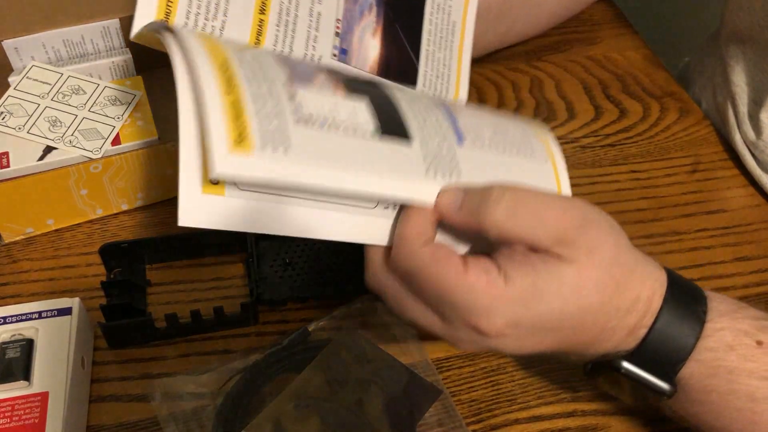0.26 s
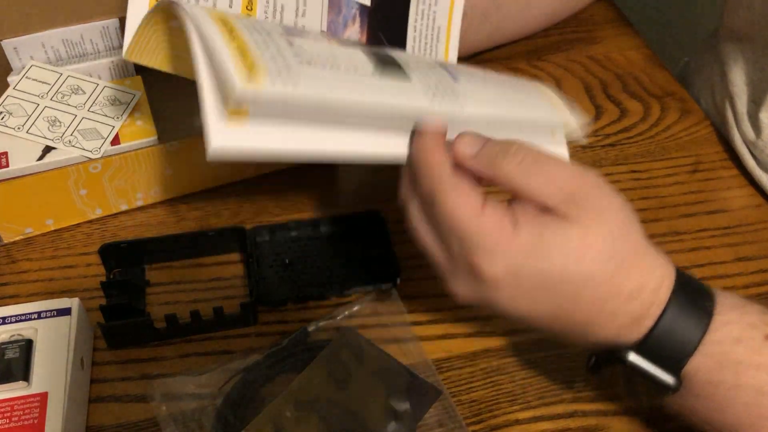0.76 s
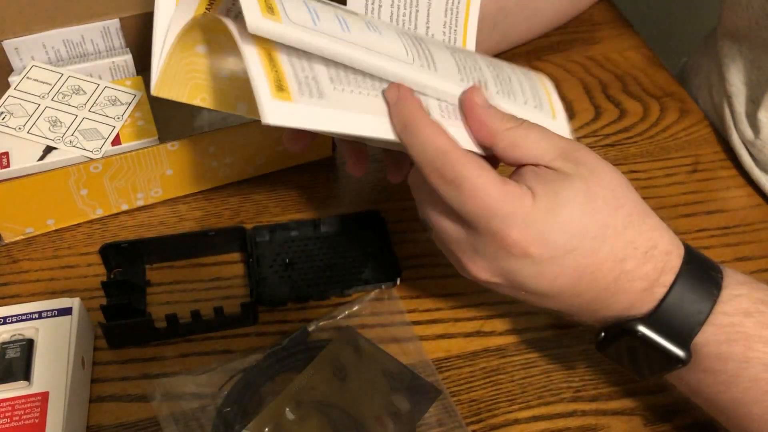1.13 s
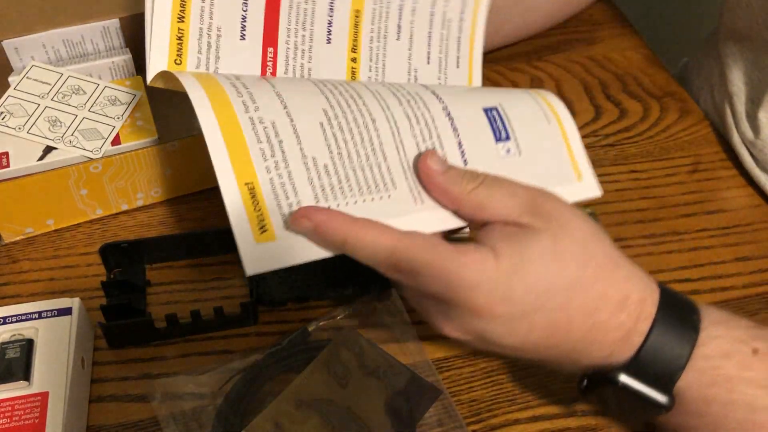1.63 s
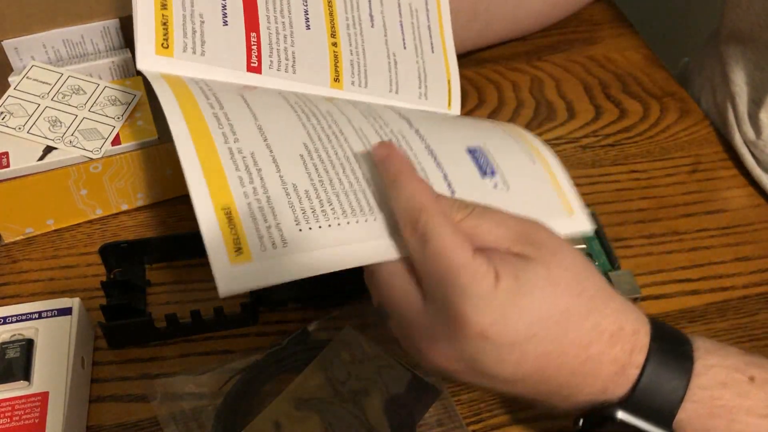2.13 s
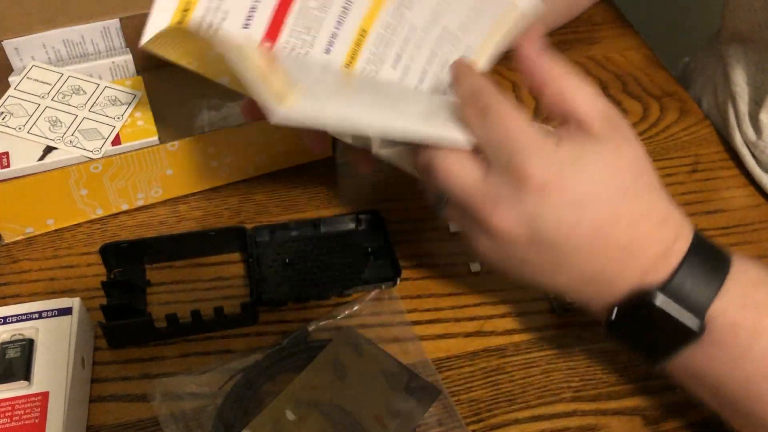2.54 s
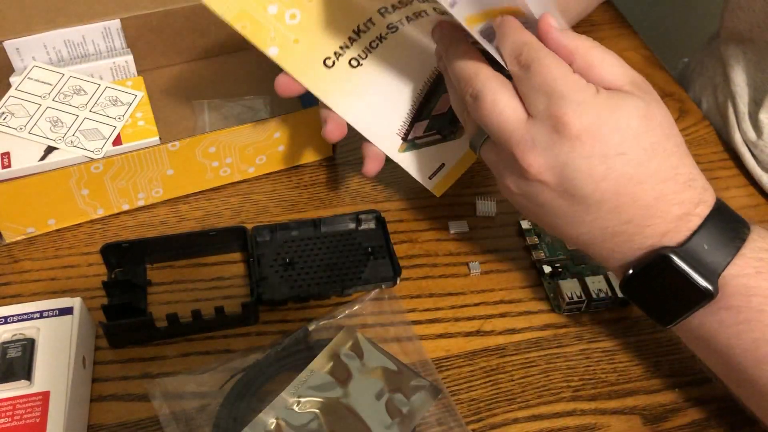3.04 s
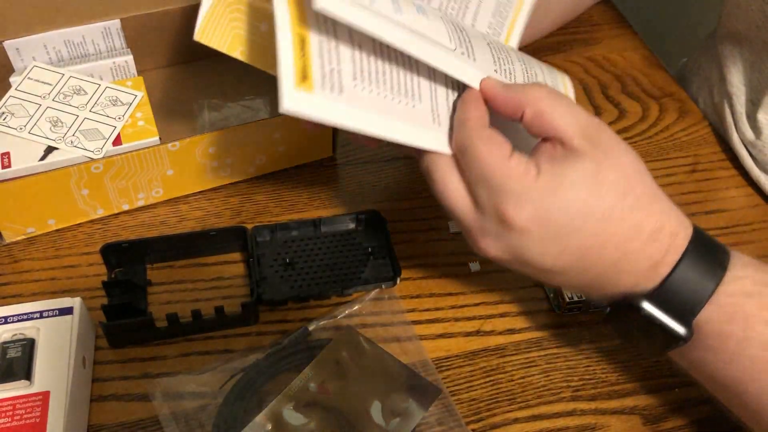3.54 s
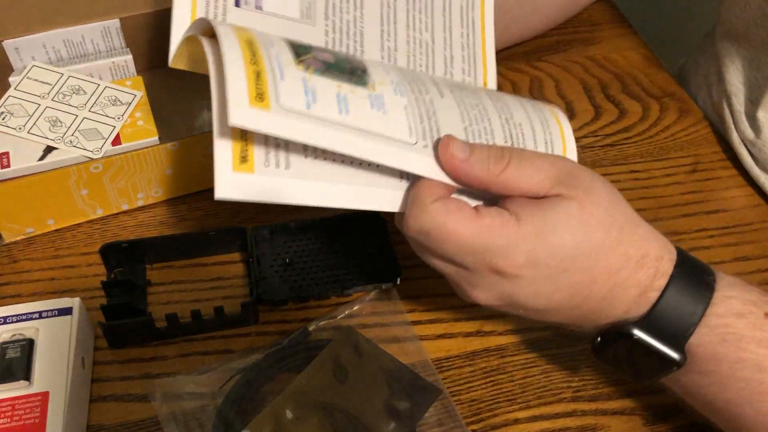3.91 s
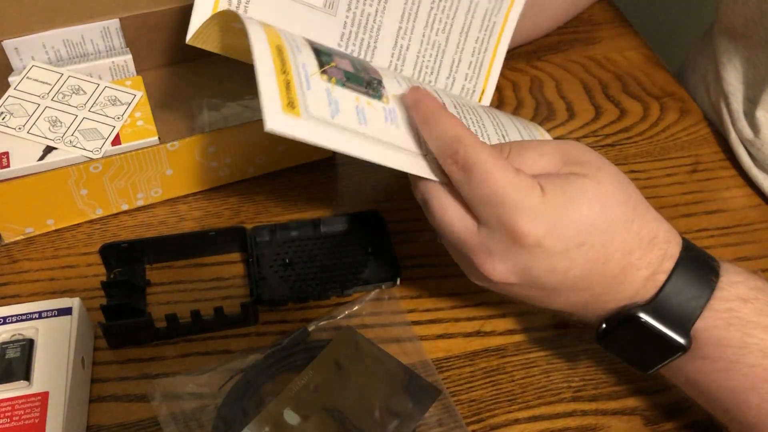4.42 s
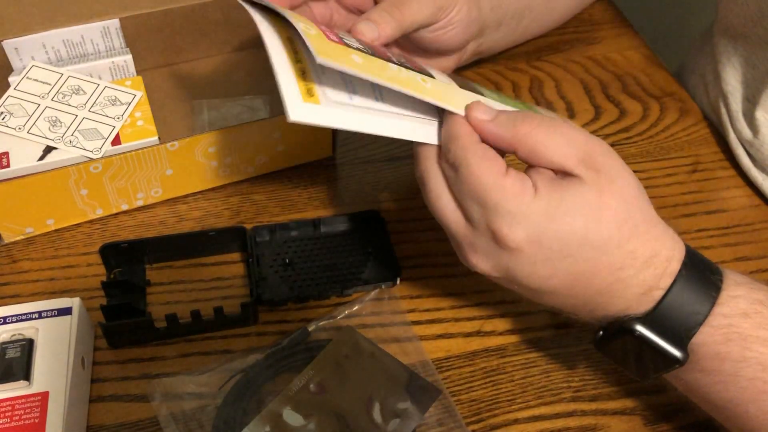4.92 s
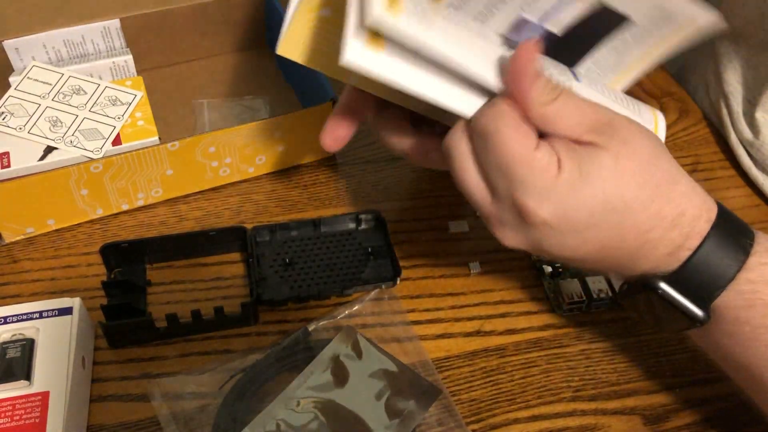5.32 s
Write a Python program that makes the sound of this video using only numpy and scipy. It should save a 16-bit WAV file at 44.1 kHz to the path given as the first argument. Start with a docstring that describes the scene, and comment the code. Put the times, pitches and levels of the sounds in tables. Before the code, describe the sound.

Pages of a stapled booklet are flipped by hand in uneven flicks, papery rustles and soft flops over a low wavering ventilation hum.

```python
"""A stapled booklet is leafed through by hand above a wooden table in a small room.
From the first moment sheets slide and crinkle as shaped noise, and bent edges snap as bursts of crackle.
After a second, edges chafe as short wavering tones and the wad first flops, a blow ringing several modes.
Past three and a half seconds the snaps and flops grow firmer, and they crowd together near the end.
Under it all run a ventilation hum of wavering and narrow tones, air noise and a deep rumble."""
import sys
import numpy as np
from scipy import signal
from scipy.fft import rfft, irfft, next_fast_len
from scipy.io import wavfile
from scipy.ndimage import uniform_filter1d, map_coordinates

SR = 44100
rng = np.random.default_rng(int(sys.argv[2]) if len(sys.argv) > 2 else 0)


def waveform_to_disk(signal):
    """Save audio, clipped to [-1, 1], as 16-bit WAV at the path in sys.argv[1]."""
    frames = np.transpose(np.atleast_2d(signal))
    scaled = np.clip(frames, -1, 1) * 32767
    samples = np.round(scaled).astype(np.int16)
    wavfile.write(sys.argv[1], SR, samples)


N = 245498  # length [samples]

# strongest hum tone, before its trim and flutter: (time [s], level [dB])
DRONE_LEVEL = [(0.0, -50), (0.14, -32.5), (1.69, -37.5), (1.71, -41), (1.81, -27), (1.89, -43),
               (2.0, -28.5), (2.47, -31.5), (2.5, -44), (2.56, -28), (2.63, -40.5), (2.77, -31.5),
               (2.95, -44.5), (3.18, -27), (3.26, -42), (3.32, -32), (3.42, -45.5), (3.63, -27.5),
               (3.69, -49), (3.81, -22), (3.91, -33.5), (4.0, -25), (4.11, -39.5), (4.5, -27), (4.57, -39),
               (4.93, -47), (5.01, -26), (5.05, -45), (5.19, -31), (5.32, -41.5), (5.4, -28.5),
               (5.57, -33.5)]
# weaker hum lines: (frequency [Hz], width [Hz], level [dB])
HUM_LINES = [(49.7, 34, -37), (122.5, 9.8, -39), (172.9, 12.5, -45.5), (211, 11.5, -45), (253.65, 6.1, -45),
             (298, 20, -48), (430.6, 14, -52.5)]
# colour of the air noise: (frequency [Hz], relative density [dB per Hz])
AIR_SPECTRUM = [(30, -9.5), (60, -9.5), (105, 2.5), (155, -3.5), (260, -5.5), (350, -14.5), (560, -18),
                (760, -19.5), (1000, -27.5), (2000, -37.5), (3300, -43), (4500, -46), (6200, -49),
                (11500, -51.5)]
# colour of the deep rumble: (frequency [Hz], relative density [dB per Hz])
RUMBLE_SPECTRUM = [(1, -18), (4, -11), (8, 0), (16, -1), (22, -8), (28, -16), (45, -20), (90, -50),
                   (400, -120)]
# loudness of the deep rumble: (time [s], level [dB])
RUMBLE_LEVEL = [(0, -23), (2.3, -25), (3.4, -32.5), (5.57, -29.5)]
# decay of the room's tail: (frequency [Hz], t60 [s])
ROOM_DECAY = [(200, 0.1), (900, 0.24), (2200, 0.27), (5000, 0.14), (11000, 0.1)]
# a sheet sliding over its neighbour, levels before the trims:
# (fastest moment [s], rise [s], fall [s], papery body [dB], edge hiss over the body [dB])
STROKES = [(0.01, 0.025, 0.021, -49.5, -4), (0.09, 0.04, 0.03, -63, 6), (0.46, 0.011, 0.014, -41, -12.5),
           (0.59, 0.064, .02, -44, -11), (0.855, 0.051, 0.077, -49.5, -6), (1.12, 0.041, 0.059, -42, -0.5),
           (1.205, 0.05, .03, -40, -6), (1.28, 0.014, 0.091, -42, -7.5), (1.62, 0.046, 0.019, -49.5, -1),
           (2.475, 0.011, 0.033, -49, -9), (2.54, 0.026, 0.048, -44, -5), (2.64, 0.022, 0.015, -53, 3),
           (2.775, 0.06, .05, -45, -7), (2.885, 0.038, 0.032, -49, 0), (3.0, 0.02, 0.034, -51.5, 2),
           (3.235, 0.012, .03, -45.5, -10), (3.285, 0.012, 0.028, -45.5, 4.5),
           (3.315, 0.02, 0.031, -41.5, -3), (3.71, 0.016, 0.078, -44.5, -5.5),
           (3.85, 0.055, 0.11, -42, -10), (4.11, 0.076, .06, -46, -7), (4.19, 0.043, 0.033, -40, -5.5),
           (4.3, 0.076, 0.034, -45, -7), (4.65, 0.073, 0.024, -45, -3), (4.70, .012, 0.055, -41, -18),
           (5.13, 0.048, 0.02, -35, -9.5), (5.165, 0.023, 0.018, -38, -10),
           (5.197, 0.014, 0.064, -32.5, -2.5), (5.28, 0.054, 0.085, -37.5, -5.5),
           (5.39, 0.05, 0.028, -42, -5), (5.485, 0.035, 0.05, -42, -1.5), (5.56, 0.079, .08, -42, -5)]
# colour of the sheet's papery body: (frequency [Hz], relative density [dB per Hz])
BODY_SPECTRUM = [(150, -32), (300, -0.5), (600, 4.5), (900, -1.5), (1250, 0.5), (1650, -4), (2200, -3.5),
                 (2900, -8.5), (3500, -12), (4600, -25), (8000, -58), (13000, -77)]
# colour of the sheet edge's hiss: (frequency [Hz], relative density [dB per Hz])
HISS_SPECTRUM = [(500, -60), (2000, -16), (3600, -2), (5000, -2.5), (6400, 2), (7300, 0), (8200, -2.5),
                 (10000, -4.5), (11600, -4), (13000, -60)]
# an edge chafing with a faint squeak: (centre time [s], length scale [s], pitch [Hz], level [dB], width [Hz])
CHAFES = [(1.14, 0.072, 3620, -47.5, 700), (1.207, 0.019, 3620, -43, 895), (1.214, 0.07, 1259, -46.5, 479),
          (1.566, 0.27, 4770, -65.5, 795), (2.917, 0.017, 5500, -53, 500), (3.306, 0.023, 6540, -51, 1104),
          (4.192, 0.0025, 5060, -31, 900), (5.096, 0.01, 1510, -40, 130), (5.123, 0.019, 4100, -42.5, 550),
          (5.13, 0.021, 2680, -47, 160), (5.159, 0.0098, 2680, -35.5, 139.5),
          (5.184, 0.13, 1120, -43.5, 481), (5.21, 0.04, 3750, -45, 902), (5.248, 0.012, 1940, -41, 399)]
# modes of the wad, before the grip shifts them: (frequency [Hz], width [Hz], level [dB])
WAD_MODES = [(252, 116, 8.5), (390, 280, 6.5), (700, 117, 4.5), (1100, 214, 1.5), (1350, 360, -7),
             (1850, 790, -18), (2500, 900, -26)]
# the wad flopping against the hand:
# (time [s], ring [dB], push [dB], push width [s], ring pitch [Hz], t60 [s], mode shift by the grip [ratio])
FLOPS = [(1.2635, -32.5, -45, 0.00054, 1350, 0.008, 1.05), (2.272, -46, -48, .001, 1000, 0.05, 1.07),
         (2.535, -42, -43, .001, 800, 0.045, 0.9), (2.766, -48, -48, 0.00089, 700, 0.046, 1.26),
         (2.797, -35.5, -48, .001, 415, 0.06, 1.3), (3.682, -35, -28, 0.0008, 1300, 0.05, 1.13),
         (4.0445, -31, -10, 0.0007, 700, 0.011, 0.97), (4.682, -27, -12, 0.0014, 1250, 0.015, 1.15),
         (4.688, -30, -19, 0.0012, 600, 0.066, 0.99), (4.7185, -36, -19, 0.00085, 400, 0.04, 0.74),
         (5.274, -33.5, -32, .001, 450, 0.048, 1.16), (5.402, -28.5, -26, 0.00085, 850, 0.022, 0.976),
         (5.4054, -24.5, -28, 0.00072, 930, 0.018, 1), (5.414, -34, -23, 0.002, 400, 0.1, 1.04),
         (5.45, -29, -34, 0.0012, 420, 0.14, 0.99), (5.469, -34.5, -32, .0007, 796, 0.034, 1),
         (5.5097, -41, -38, 0.00048, 1100, 0.035, 1.06)]
# page edges snapping off the thumb, before the common trim and tilt:
# (time [s], level [dB], ring of the bend [Hz], treble share [dB], t60 [s])
SNAPS = [(0.013, -31, 1480, -17, 0.013), (0.022, -39.5, 1700, -21, .016), (0.198, -38.5, 1870, -32, 0.033),
         (0.455, -39, 3300, -25, 0.04), (0.586, -35.5, 1940, -16, 0.084), (0.855, -36, 1600, -23, 0.042),
         (0.888, -37.5, 1700, -15, 0.034), (1.2638, -33.5, 3020, -13, 0.017),
         (1.2733, -37.5, 3330, -23, 0.02), (1.358, -40, 2200, -22, .03), (1.363, -31, 2660, -34, 0.051),
         (1.408, -42, 2300, -32, 0.033), (1.607, -39, 1930, -28, 0.025), (2.267, -35, 1690, -27, 0.014),
         (2.276, -37, 1680, -32, 0.016), (2.345, -39, 1750, -12, 0.025), (2.466, -47, 1900, -26, .02),
         (2.479, -45, 1900, -24, .012), (2.492, -50, 2100, -18, .01), (2.5338, -36.5, 1480, -9, .035),
         (2.6447, -39.5, 3300, -15, .016), (2.6638, -35.5, 1800, -20, 0.035),
         (2.719, -38.5, 1800, -16, .02), (2.765, -37, 1960, -14, .012), (2.7696, -38.5, 2500, -20, .016),
         (2.7906, -33, 2000, -22, 0.028), (2.802, -34, 2040, -25, 0.028), (2.8564, -48, 3600, 1, 0.012),
         (2.8903, -37, 1870, -12, 0.02), (2.9213, -32, 1800, -21, 0.055), (2.9522, -51, 2880, -21, 0.012),
         (2.9673, -40, 2450, -22, 0.017), (2.9819, -38, 3220, -14, 0.015), (3.681, -27, 1800, -8, 0.046),
         (3.6885, -30, 1910, -28, 0.041), (3.9817, -33, 1500, -21, 0.052), (4.0454, -27, 2170, -25, 0.016),
         (4.078, -29, 2000, -32, 0.016), (4.085, -35, 1900, -27, 0.022), (4.187, -26.5, 2140, -27, 0.036),
         (4.1911, -25.5, 3480, -22, 0.015), (4.3119, -38, 2200, -15, 0.023),
         (4.678, -29.5, 3200, -17, 0.016), (4.683, -29, 2780, -24, 0.021), (4.689, -25, 1850, -36, .03),
         (4.701, -39, 2300, -32, .03), (4.7125, -43, 2000, -25, 0.018), (4.722, -42, 2100, -38, .025),
         (4.793, -38, 2000, -23, 0.035), (4.955, -40, 2100, -14, 0.015), (4.973, -43.5, 2100, -15, .015),
         (5.008, -34, 2010, -27, 0.059), (5.06, -43, 1900, -34, .025), (5.072, -35, 2400, -25, .03),
         (5.1698, -30, 1400, -32, 0.018), (5.241, -28.5, 1990, -34, 0.026), (5.2753, -23, 3440, -23, 0.027),
         (5.294, -36, 3120, -29, .018), (5.3725, -29.5, 3300, -19, 0.038), (5.383, -34, 2850, -34, 0.017),
         (5.3968, -29.5, 2370, -13, 0.038), (5.469, -24.5, 2740, -23, 0.013),
         (5.4767, -33, 1600, -30, 0.024), (5.5098, -27, 2500, -12, 0.014), (5.5406, -34, 1450, -20, .025)]
# common colour of a snapping edge: (frequency [Hz], relative density [dB per Hz])
EDGE_SPECTRUM = [(200, 14), (600, 1.5), (1300, 2.5), (2200, 4), (3400, 5), (4600, 2), (6500, 8.5),
                 (8500, 2), (11500, -1), (14000, -39)]

TOP_HZ = 11680  # upper limit of the sound
STROKE_SHAPE = 1.2  # exponent of rise and fall: low = pointed, high = rounded
HOLD_BODY_DB, HOLD_HISS_DB = -69, -68.5  # before trims: fingers never rest quite still on the paper
# a tighter bend rings higher and has less low-mid body
BEND_HZ, FULLNESS_DB, THINNING_DB_PER_OCTAVE = 1800, 12.5, 13.5
TICKS_PER_S, TICK_DB, TICK_SPREAD_DB = 26, -0.5, 2  # small creases, levels over the rub that bends them
CREASE_HZ = 2500  # typical ring of a small crease
# a firm snap starts at once; the attack doubles for each step softer
FIRM_DB, FIRM_ATTACK_S, SOFTER_DB = -34, 0.00016, 8
DRAG_S, DRAG_DB = 0.0059, -16.5  # the edge drags ever harder just before it springs free
CRACK_DELAY_S, CRACK_SHARE = 0.0006, 0.42  # one clean crack on the next sheet, sized against the crackle


def amp(db):
    """Decibels to amplitude."""
    return 10 ** (np.asarray(db) / 20)


def unit(x):
    """x at rms 1."""
    return x / np.sqrt(np.mean(x ** 2) + 1e-20)


def along(points, hz):
    """Read (Hz, value) points on a log frequency axis."""
    f, v = np.transpose(points)
    return np.interp(np.log(hz + 1), np.log(f + 1), v)


def curve(points):
    """One value per sample through (s, value) points."""
    s, values = np.transpose(points)
    return np.interp(np.arange(N) / SR, s, values)


def wobble(rate):
    """A smooth random curve, rate knots a second."""
    knots = rng.standard_normal(int(N * rate / SR) + 4)
    return map_coordinates(knots, [np.arange(N) * rate / SR])


def filtered(x, response):
    """x times a complex response of frequency."""
    m = next_fast_len(len(x) + 8192)
    spectrum = rfft(x, m) * response(np.fft.rfftfreq(m, 1 / SR))
    return irfft(spectrum, m)[:len(x)]


def causal(gain):
    """The minimum-phase response with this gain: nothing sounds before the blow."""
    cepstrum = irfft(np.log(np.maximum(gain, 1e-6)))
    half = len(cepstrum) // 2
    cepstrum[1:half] *= 2
    cepstrum[half + 1:] = 0
    return np.exp(rfft(cepstrum))


def coloured(x, spectrum):
    """x shaped by the given spectrum, at rms 1."""
    return unit(filtered(x, lambda hz: amp(along(spectrum, hz))))


def narrow(centre, width):
    """Noise of rms 1 in one resonance."""
    return unit(filtered(rng.standard_normal(N), lambda hz: 1 / (1 + ((hz - centre) / width * 2) ** 2)))


def add(track, s, x):
    """Mix x into the track at s seconds."""
    i = max(round(s * SR), 0)
    track[i:i + len(x)] += x[:max(len(track) - i, 0)]


def ventilation(drone_hz=138.25, waver_hz=3.51, flutter_db=2.5, drone_trim_db=-1.5):
    """A wavering, fluttering tone and weaker hum lines over broad air noise and a deep rumble."""
    pitch = drone_hz + waver_hz * wobble(15)
    flutter = unit(wobble(6) + wobble(13))
    drone_gain = amp(curve(DRONE_LEVEL) + drone_trim_db + flutter_db * flutter)
    drone = drone_gain * np.sqrt(2) * np.sin(2 * np.pi * np.cumsum(pitch) / SR)
    hum = sum(amp(db) * narrow(hz, width) for hz, width, db in HUM_LINES)
    air = amp(-34.0) * coloured(rng.standard_normal(N), AIR_SPECTRUM)
    rumble = amp(curve(RUMBLE_LEVEL)) * coloured(rng.standard_normal(N), RUMBLE_SPECTRUM)
    return drone + hum + air + rumble


def room(x):
    """The walls' answer: a noise tail whose decay depends on frequency, quickest at both ends."""
    hz, t, z = signal.stft(rng.standard_normal(SR // 2), SR, nperseg=256)
    decay = amp(-60 * t / along(ROOM_DECAY, hz)[:, None])
    tail = signal.istft(z * decay, SR, nperseg=256)[1]
    delayed_tail = np.pad(tail / np.linalg.norm(tail), (SR // 250, 0))  # 4 ms to the walls
    return signal.fftconvolve(x, delayed_tail)[:N]


def table_top(x, echo_db=-10, delay_s=0.0023, sway=0.165):
    """The wood below returns a duller echo; its delay sways as the booklet is waved about."""
    delay = delay_s * np.exp(sway * wobble(6))
    dull = filtered(x, lambda hz: 1 / (1 + 1j * hz / 6000))
    echo = map_coordinates(dull, [np.arange(N) - delay * SR])
    return x + amp(echo_db) * echo


def rubbing():
    """Gains of body and hiss: each stroke speeds up and slows down, and strokes add in power."""
    t = np.arange(N) / SR
    body, hiss = amp(HOLD_BODY_DB) ** 2, amp(HOLD_HISS_DB) ** 2
    for s, rise, fall, db, hiss_db in STROKES:
        speed = np.exp(-np.maximum((s - t) / rise, (t - s) / fall) ** STROKE_SHAPE)
        body = body + (amp(db) * speed) ** 2
        hiss = hiss + (amp(db + hiss_db) * speed) ** 2
    return np.sqrt(body), np.sqrt(hiss)


def friction(catch_rate, spread_db, smooth):
    """Fibres catching and letting go: tiny clicks of uneven size over a smooth rub."""
    sizes = amp(spread_db * np.minimum(rng.exponential(size=N), 4))
    catches = (rng.random(N) < catch_rate / SR) * sizes
    return unit(catches * rng.standard_normal(N)) + smooth * rng.standard_normal(N)


def patchy(x, depth_db):
    """A bending sheet favours ever-changing frequencies."""
    z = signal.stft(x, nperseg=512)[2]
    field = uniform_filter1d(rng.standard_normal(z.shape), size=5, axis=0)  # smooth across frequency
    field = uniform_filter1d(field, size=9, axis=1)  # and over time
    return signal.istft(z * amp(depth_db * unit(field)), nperseg=512)[1][:N]


def creases(rate, spread_db, centre_hz, cycles):
    """Small kinks popping in the sheets: each rings for a few cycles at its own pitch."""
    u = rng.random((int(rate * N / SR), 4))
    start = (u[:, 0] * N).astype(int)
    size = amp(-spread_db * np.log(.02 + u[:, 1]))
    hz = centre_hz * 2 ** (3 * (u[:, 2:3] - .5))
    t = np.arange(SR // 100) / SR
    decay = np.exp(-t * hz / (cycles * (.5 + u[:, 3:])))
    pops = size[:, None] * np.sin(2 * np.pi * hz * t) * decay
    pops *= hz / centre_hz  # tight kinks pop higher and harder
    places = start[:, None] + np.arange(len(t))
    return unit(np.bincount(places.ravel(), pops.ravel())[:N])


def jerks(slips_per_s=90, relax_s=0.0059, spread_db=2.0, share=0.29):
    """Stick and slip: the rub leaps up at each slip and then relaxes; the gain has rms 1."""
    sizes = amp(spread_db * np.minimum(rng.exponential(size=N), 2)) ** 2
    slips = (rng.random(N) < slips_per_s / SR) * sizes
    power = signal.lfilter([1], [1, -np.exp(-1 / (relax_s * SR))], slips)
    return np.sqrt(1 - share + share * power / power.mean())


def slide(body_trim_db=-3.5, hiss_trim_db=-3):
    """Sheets rub in small jerks; the face crinkles and gives the body, the edge a smoother hiss."""
    body_gain, hiss_gain = rubbing()
    pressure_db = wobble(45)
    rub = patchy(unit(friction(catch_rate=2200, spread_db=3.3, smooth=.8)), depth_db=2.1)
    crinkle = creases(rate=1200, spread_db=3.2, centre_hz=2600, cycles=3.2)
    body = body_gain * amp(body_trim_db) * coloured(rub + crinkle, BODY_SPECTRUM)
    hiss = hiss_gain * amp(hiss_trim_db) * coloured(rub + 0.16 * crinkle, HISS_SPECTRUM)
    jerk = jerks()
    return amp(pressure_db) * (jerk * body + np.sqrt(jerk) * hiss)


def chafes(sag_octaves=0.02, rough=0.41):
    """A dragged edge sings, from rasp to thin squeak; its pitch trembles and sags as it unbends."""
    t, out = np.arange(N) / SR, np.zeros(N)
    for s, length, hz, db, width in CHAFES:
        progress = np.clip((t - s) / length, -4, 4)
        pitch = hz * 2 ** (-sag_octaves * progress) + width / 2 * wobble(2 * width)
        squeak = (1 + rough * wobble(width)) * np.sin(2 * np.pi * np.cumsum(pitch) / SR)
        out += amp(db) * np.exp(-2 * progress ** 2) * unit(squeak)
    return out


def wad_response(f):
    """The wad's modes as resonances of alternating sign."""
    return sum((-1) ** k * amp(db) * 1j * f * w / (c * c - f * f + 1j * f * w)
               for k, (c, w, db) in enumerate(WAD_MODES))


def flops(attack=0.0013, focus_db=7, patter=0.84, clap_db=-11, clap_t60=0.024):
    """The wad claps, shoves a puff of air and rings briefly, strongest near the pitch set by the grip."""
    out, t = np.zeros(N), np.arange(SR // 5) / SR
    onset = SR // 125  # levels are set over the first 8 ms
    for s, db, push_db, width, pitch, t60, shift in FLOPS:
        # one firm blow, then the loose sheets patter down after it
        sheets = rng.standard_normal(len(t)) * amp(-60 * t / t60) * (1 - np.exp(-t / attack))
        slaps = (t == 0) + patter * sheets / np.linalg.norm(sheets)
        focus = lambda f: causal(amp(-focus_db * np.abs(np.log2((f + 50) / pitch))))
        ring = filtered(slaps, lambda f: wad_response(f / shift) * focus(f))
        clap_noise = rng.standard_normal(len(t)) * amp(-60 * t / clap_t60)
        clap = filtered(clap_noise, lambda f: 1 / (1 + 1j * f / (2 * pitch)) ** 2)
        push = -(t / width) ** 2 * np.exp(1 - (t / width) ** 2)
        blow = ring / np.std(ring[:onset]) + amp(clap_db) * clap / np.std(clap[:onset])
        add(out, s, amp(db) * blow + amp(push_db) * push)
    return out


def stray_ticks(treble_db=-28, spread_octaves=0.55, t60=0.0087):
    """Small creases pop at random, oftener and harder the faster the sheets slide; rows as in SNAPS."""
    body_gain, _ = rubbing()
    count = int(TICKS_PER_S * N / SR)
    effort = np.cumsum(body_gain ** .7)
    starts = np.searchsorted(effort, rng.random(count) * effort[-1])
    ticks = []
    for i, (a, b) in zip(starts, rng.standard_normal((count, 2))):
        level_db = 20 * np.log10(body_gain[i]) + TICK_DB + TICK_SPREAD_DB * a
        ticks.append((i / SR, level_db, CREASE_HZ * 2 ** (spread_octaves * b), treble_db, t60))
    return ticks


def snaps(tilt=0.84, level_db=-5.5, ring_db=8.0, ring_octaves=0.17):
    """A bent edge drags, then springs free: a burst of crackle coloured by the ring of its own bend."""
    lead = SR // 20  # room for the drag before the snap
    out, t = np.zeros(N + lead), np.arange(-lead, SR // 6) / SR
    after = np.maximum(t, 0)
    for s, db, ring_hz, treble_db, t60 in SNAPS + stray_ticks():
        attack = FIRM_ATTACK_S * 2 ** ((FIRM_DB - db) / SOFTER_DB)
        spring = amp(-60 * after / t60) * (1 - np.exp(-after / attack))
        drag = amp(DRAG_DB) * np.exp(-np.abs(t) / DRAG_S)
        envelope = np.where(t < 0, drag, np.maximum(spring / spring.max(), drag))
        burst = rng.standard_normal(len(t)) * envelope
        burst[lead + round(CRACK_DELAY_S * SR)] += CRACK_SHARE * np.linalg.norm(burst)
        low_db = FULLNESS_DB - THINNING_DB_PER_OCTAVE * np.log2(ring_hz / BEND_HZ)
        lean = [(1300, low_db), (3300, 0), (7500, tilt * (treble_db + 12.5))]  # (Hz, dB)
        bend = lambda hz: ring_db / (1 + (np.log2((hz + 1) / ring_hz) / ring_octaves) ** 2)
        colour = lambda hz: causal(amp(along(EDGE_SPECTRUM, hz) + along(lean, hz) + bend(hz)))
        snap = filtered(burst, colour)
        # the level is set over the first 8 ms of the snap
        add(out, s, amp(db + level_db) * snap / np.std(snap[lead:lead + SR // 125]))
    return out[lead:]


def scene():
    """Paper above the table, its room echo and the ventilation."""
    paper = table_top(slide() + chafes() + snaps() + flops())
    return (paper + amp(-11) * room(paper) + ventilation())[None]


def record(dry):
    """A very steep low-pass closes the top of the band."""
    return np.array([filtered(x, lambda hz: 1 / (1 + (hz / TOP_HZ) ** 240)) for x in dry])


dry = scene()
out = record(dry)
waveform_to_disk(out)
```